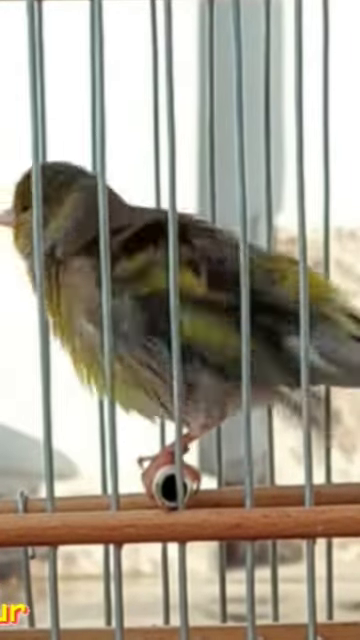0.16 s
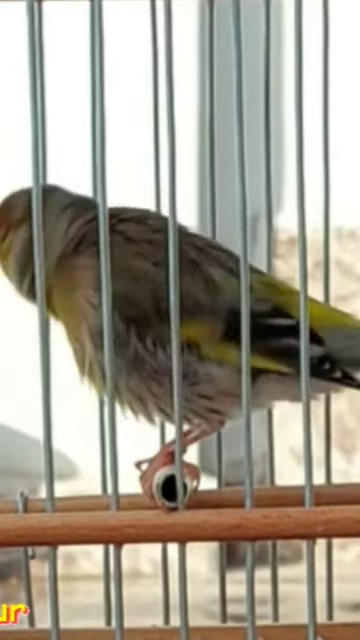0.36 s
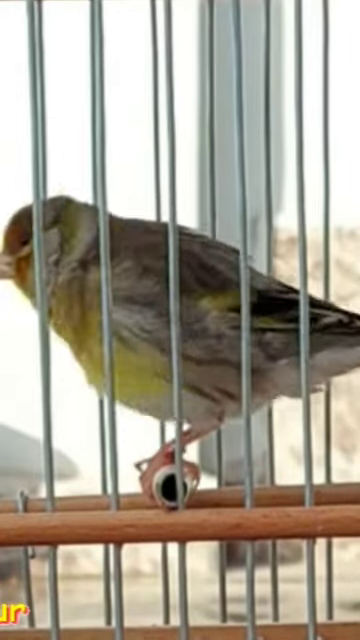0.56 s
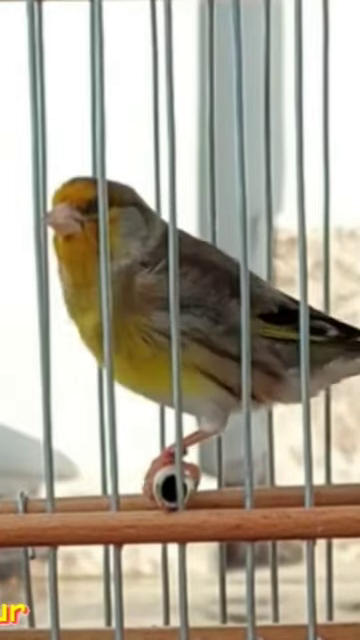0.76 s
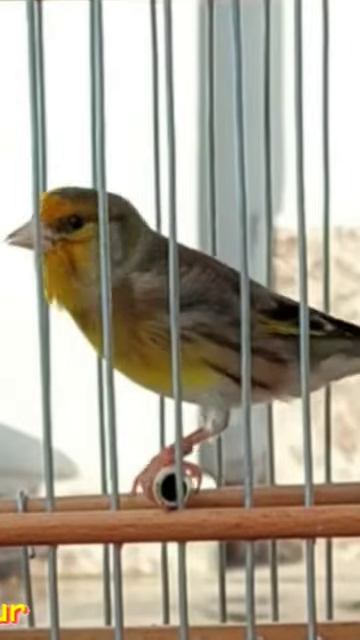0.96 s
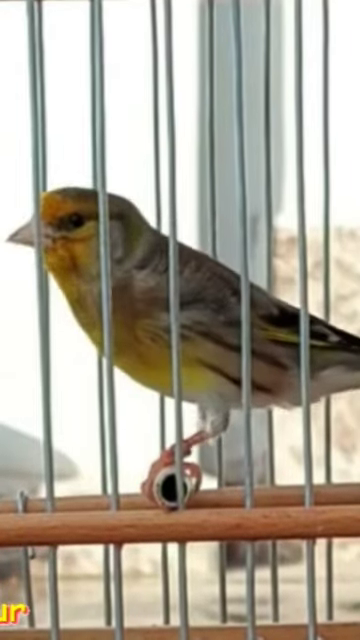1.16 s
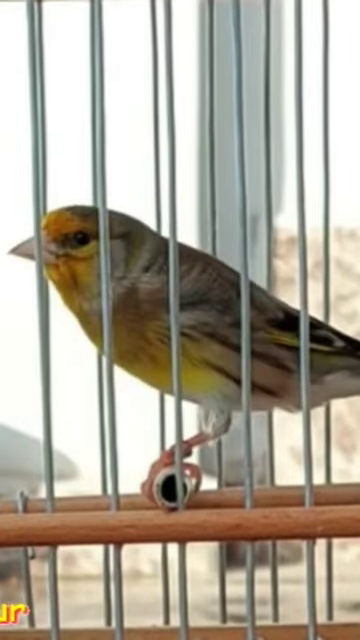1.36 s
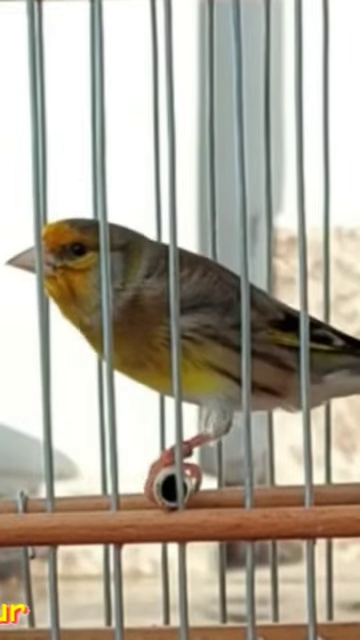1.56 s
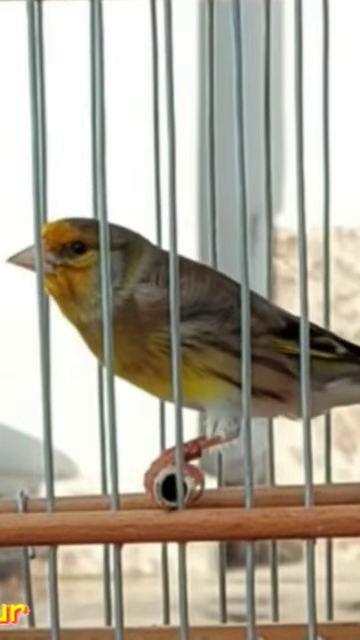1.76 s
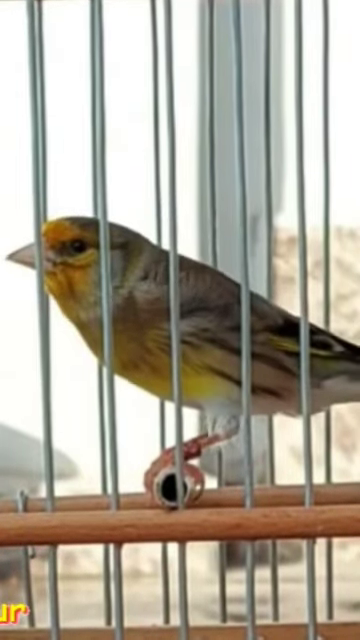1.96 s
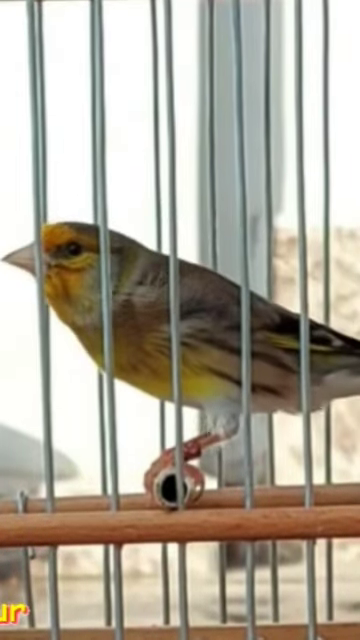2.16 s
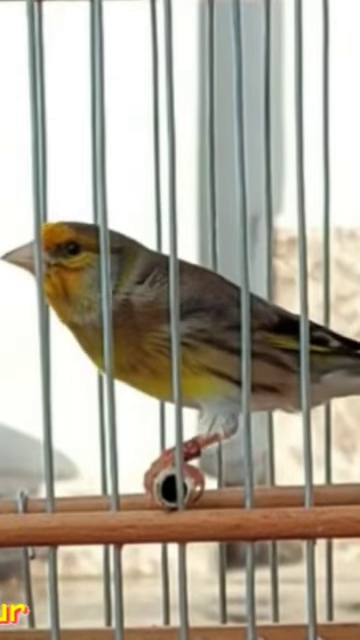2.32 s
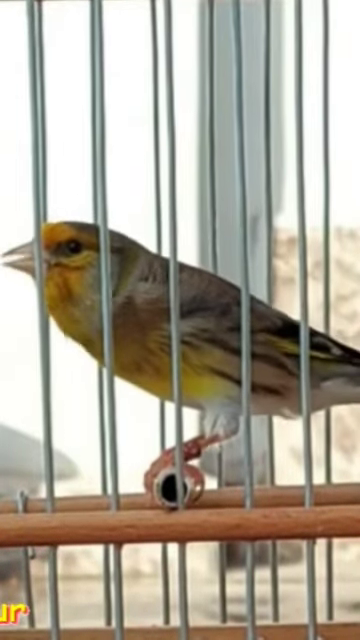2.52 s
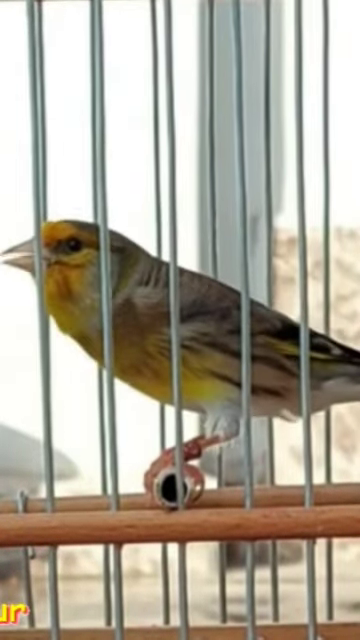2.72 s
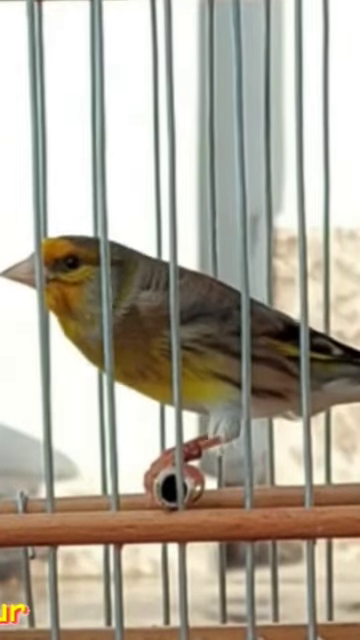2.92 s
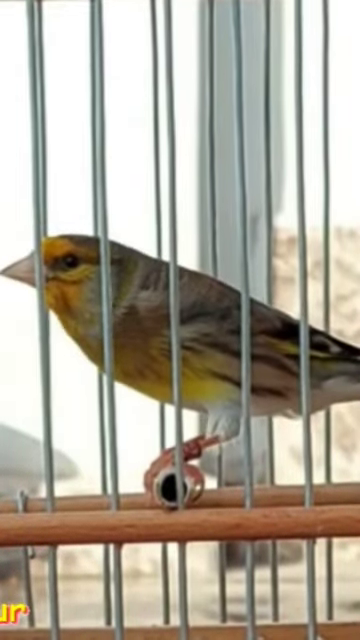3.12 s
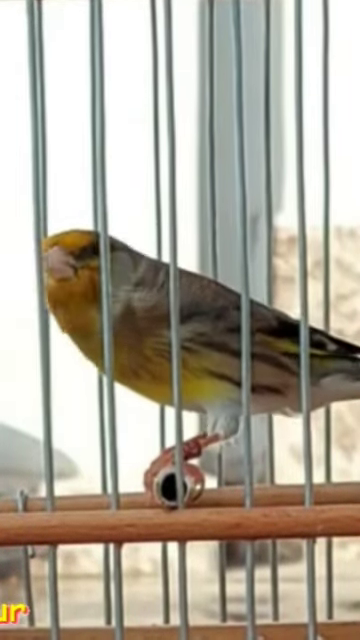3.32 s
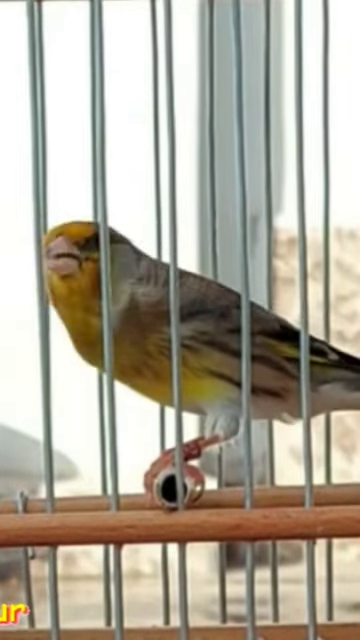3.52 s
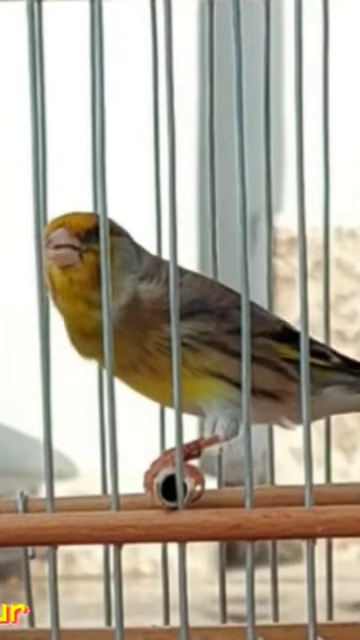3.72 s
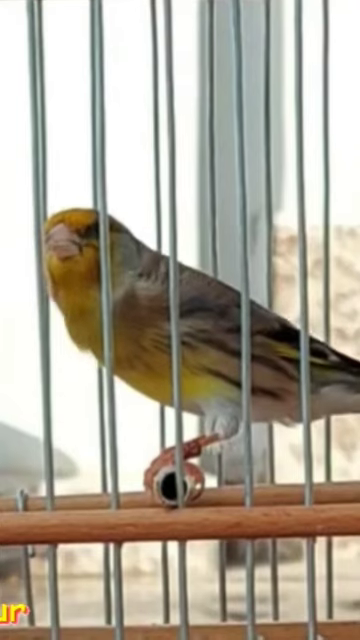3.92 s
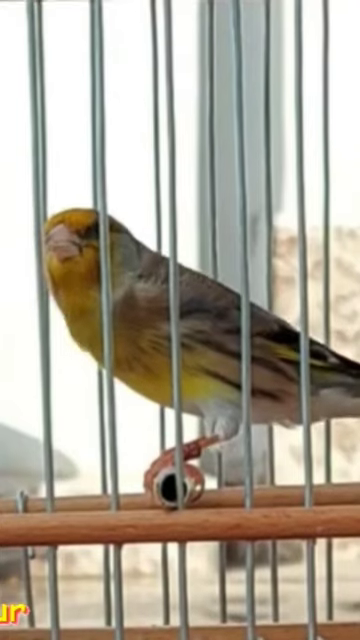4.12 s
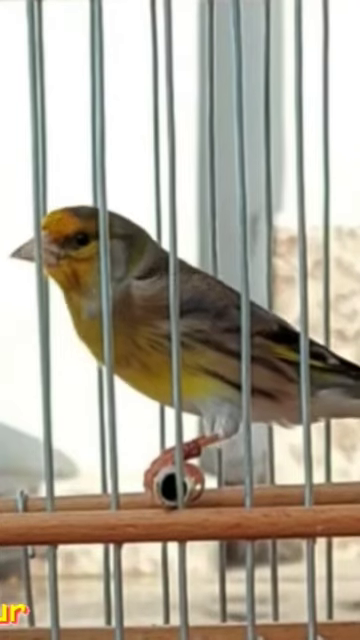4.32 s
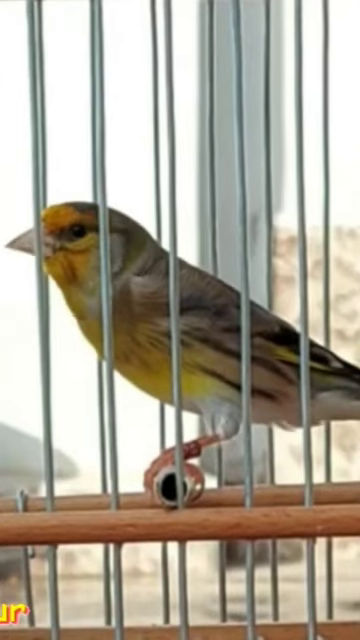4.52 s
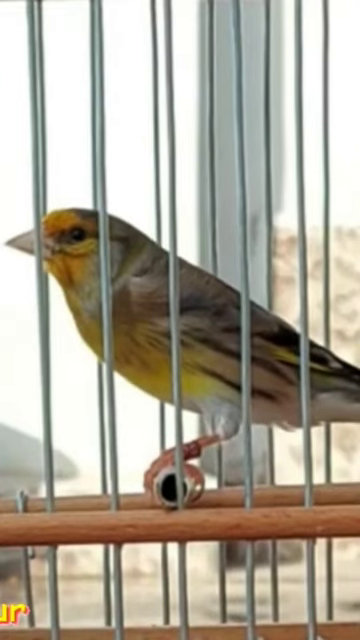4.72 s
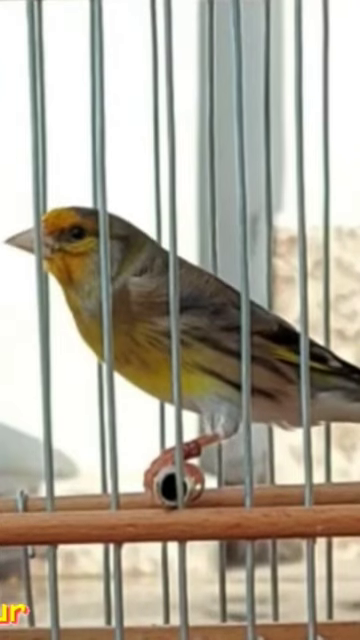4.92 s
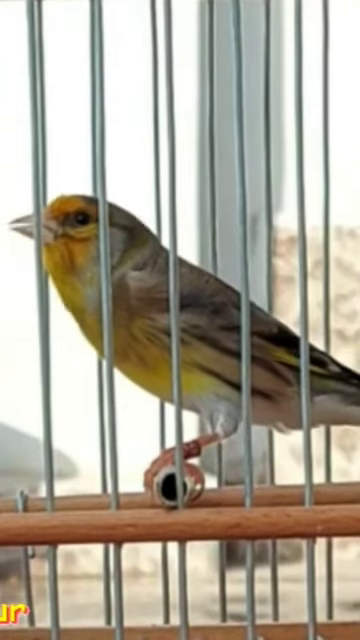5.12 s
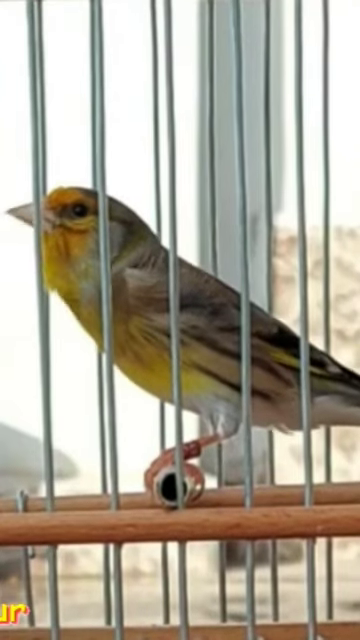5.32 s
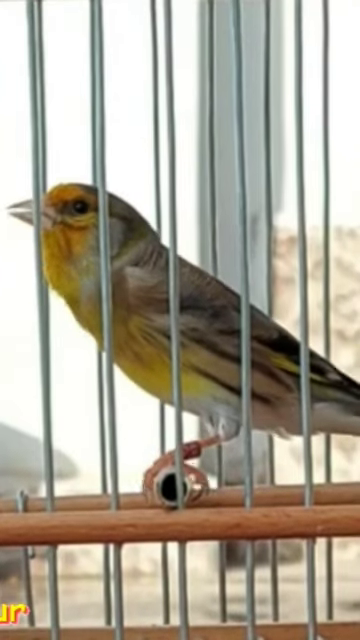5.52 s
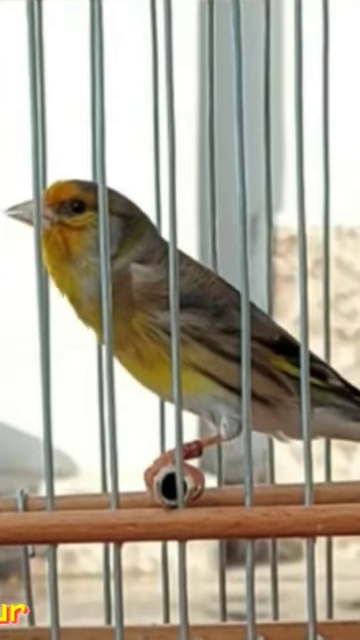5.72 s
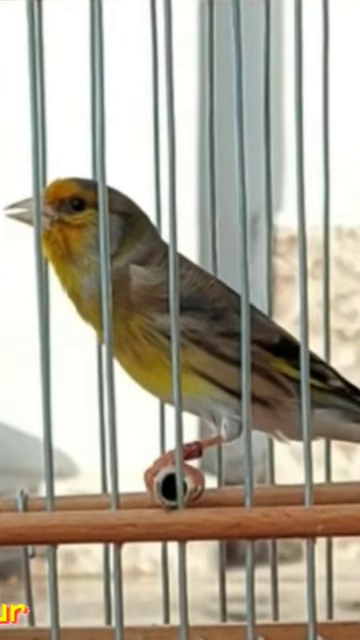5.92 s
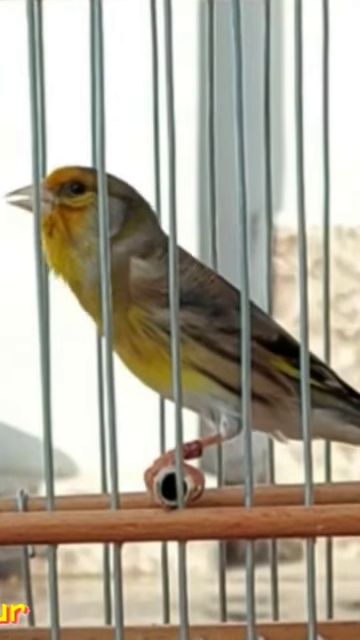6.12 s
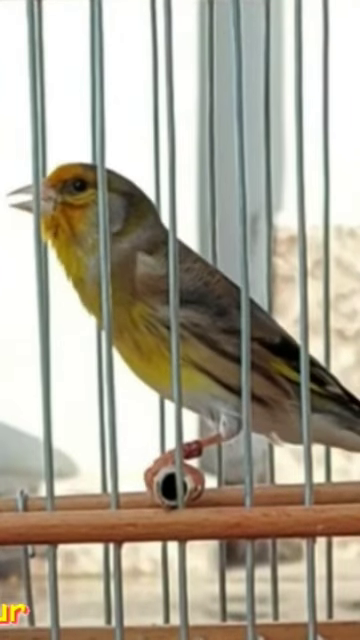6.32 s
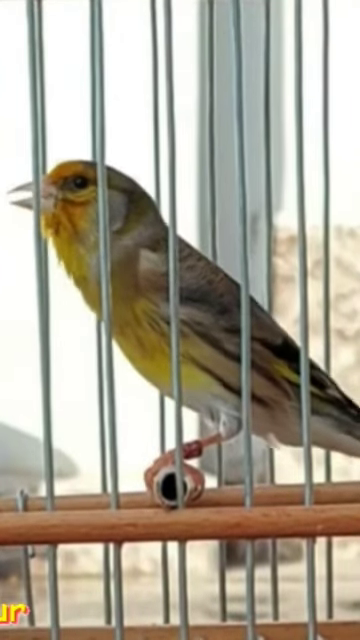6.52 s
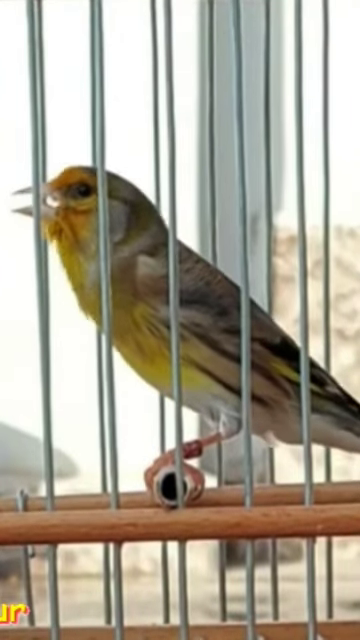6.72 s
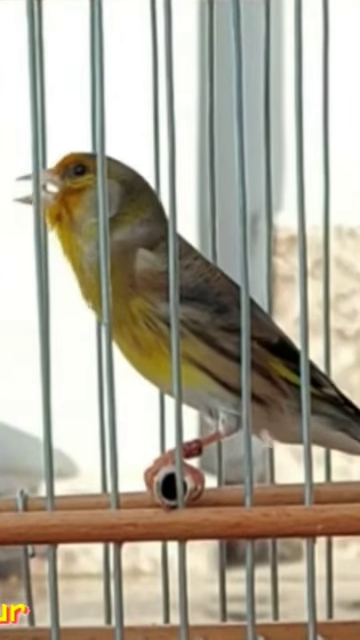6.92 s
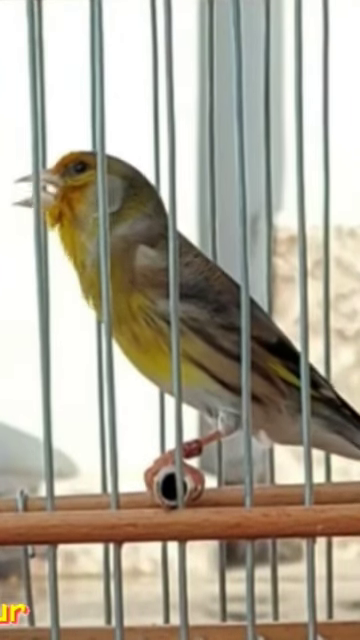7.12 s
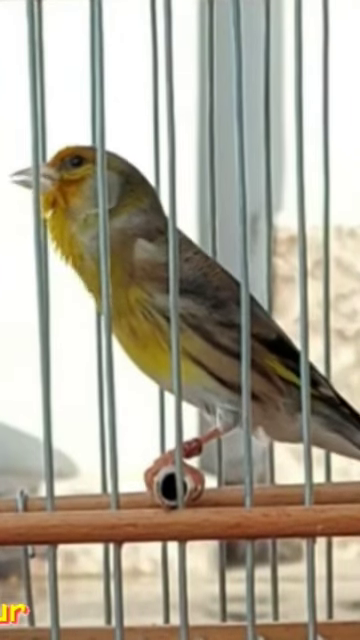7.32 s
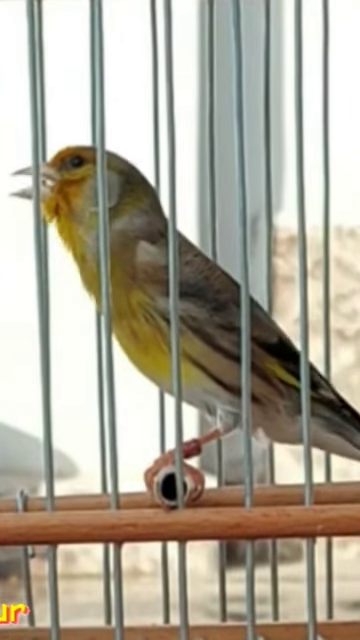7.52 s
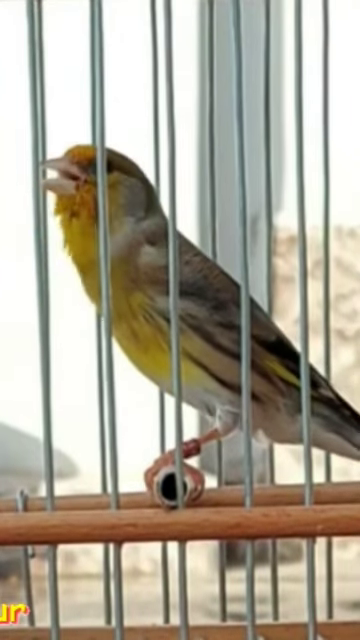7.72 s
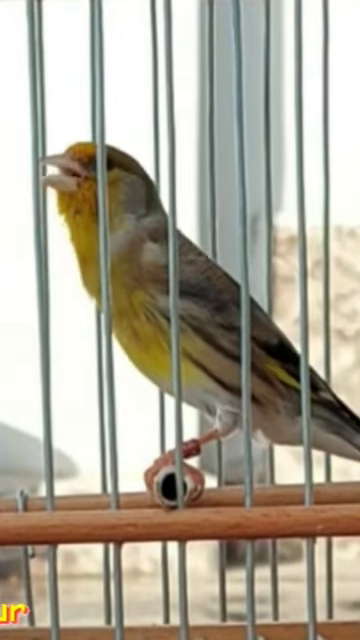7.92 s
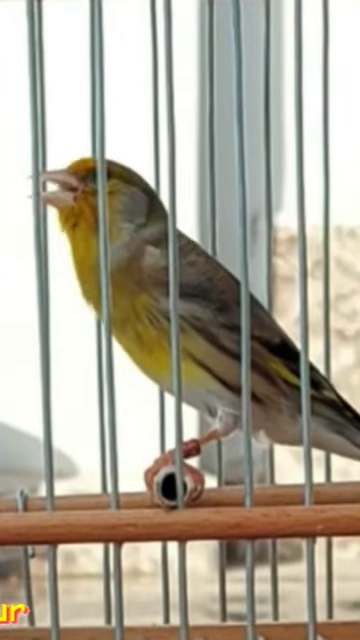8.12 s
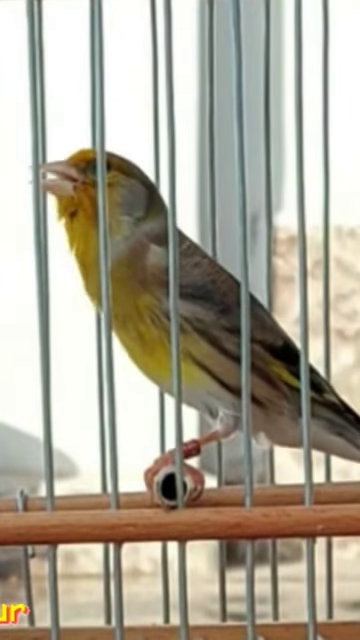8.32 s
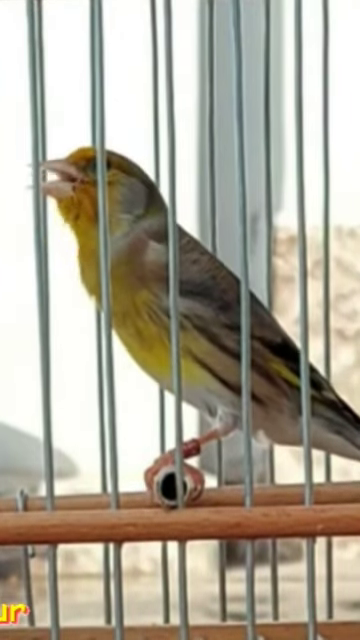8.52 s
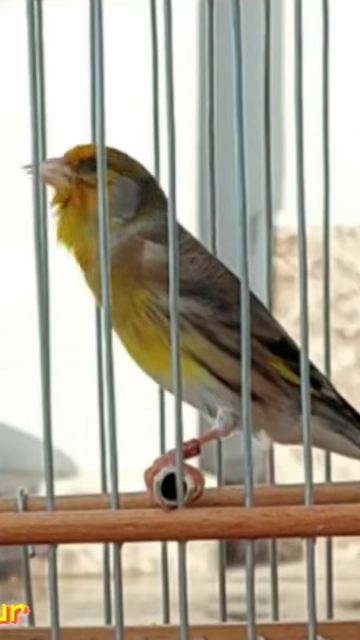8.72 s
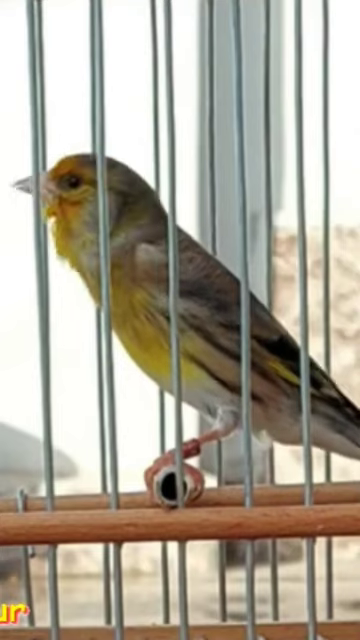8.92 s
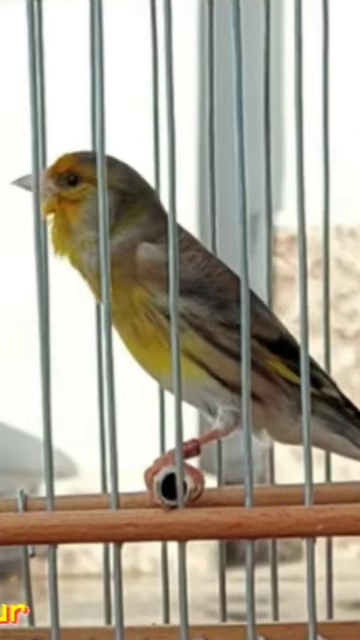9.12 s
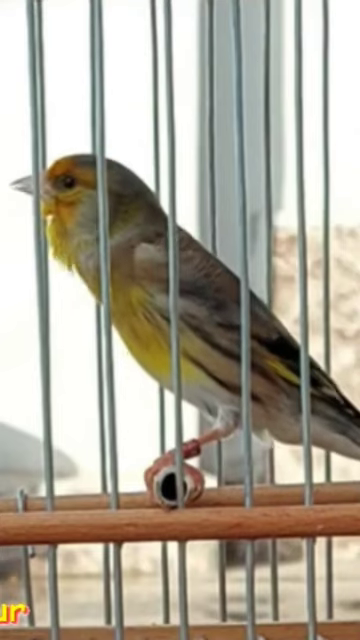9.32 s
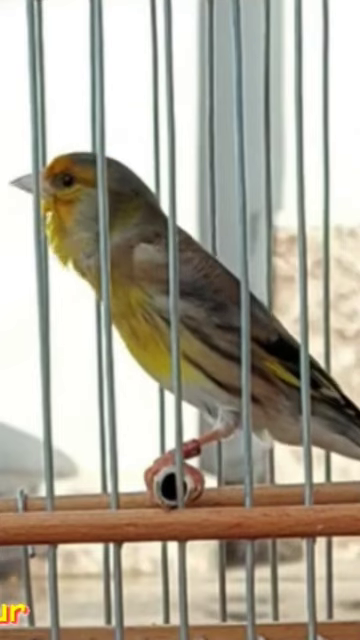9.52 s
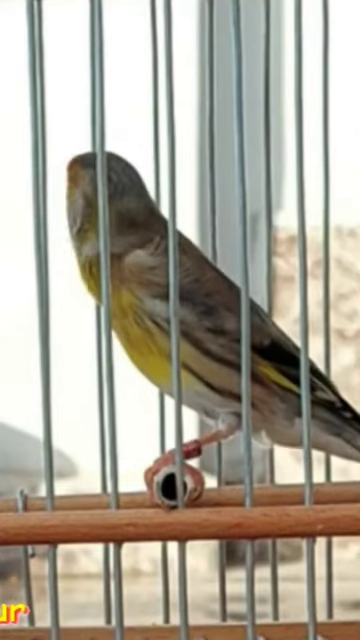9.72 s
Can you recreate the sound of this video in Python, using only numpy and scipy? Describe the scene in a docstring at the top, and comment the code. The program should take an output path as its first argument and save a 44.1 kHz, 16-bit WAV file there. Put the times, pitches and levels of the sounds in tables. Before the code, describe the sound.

A small caged finch, close to the microphone in a lightly echoing room, gives five sharp, slightly buzzy chips about a second apart, the first three followed by a quick two-note rising call. Dull rumble and soft bumps come and go underneath, with very faint whistles from a more distant bird at first. From the middle onward it sings four different rapid trills without a pause, over a quiet low murmur.

```python
"""Caged finch singing

A caged finch gives five chips, each with two voices at once, and short calls answer the first three.
It then sings four trills, each a group of whistled syllables repeated over and over. A faint two-tone tick
with a grainy edge comes early on. The room adds a short tail. Faint whistles come from a bird further off
at the start. Filtered noise makes a dull rumble that comes and goes, with soft bumps, over the room's murmur."""
import sys
import numpy as np
from scipy import signal
from scipy.fft import rfft, irfft
from scipy.io import wavfile
from scipy.ndimage import uniform_filter1d

SR = 44100
rng = np.random.default_rng(int(sys.argv[2]) if len(sys.argv) > 2 else 0)


def dump_mix(stems):
    """Bounce the given channels to the path in sys.argv[1] as a 16-bit WAV at rate SR."""
    frames = np.atleast_2d(stems).T  # one column per channel
    limited = np.clip(frames, -1, 1)  # hard clip at full scale
    pcm = np.round(limited * 32767).astype(np.int16)
    wavfile.write(sys.argv[1], SR, pcm)


N = 430416
TIME = np.arange(N) / SR
SYLLABLE_TIME = np.arange(-SR // 200, SR // 10) / SR  # s, starts just before the syllable

# All levels are relative: later gains and filters still act on them.

# Path of each syllable's pitch and strength, before stretching and retuning: time_s, pitch_hz, effort_db
CHIP_UPPER_PATH = [(0, 5724, -18), (.005, 5715, -2), (.012, 5574, -0.5), (.018, 5335, -2), (.028, 5240, -7),
                   (.038, 5330, -14)]
CHIP_LOWER_PATH = [(0, 5102, -23.5), (.006, 4920, -8), (.018, 4622, 1.5), (0.024, 4426, 1.5),
                   (.033, 4290, -4.5), (.04, 4564, -15.5)]
TU_PATH = [(0, 3250, -16), (.01, 3310, -6), (.018, 3370, -1), (.028, 3395, -2), (.036, 3450, 0),
           (.043, 3480, -12)]
WEE_PATH = [(0, 3650, -13), (.003, 4060, -4), (.008, 4310, -3), (.016, 4245, 0), (.023, 4205, -1),
            (.029, 4150, -15)]
PIP_PATH = [(0, 3080, -18), (.004, 3320, -4), (.009, 3490, 0), (.014, 3520, -6), (.019, 3450, -20)]
TEW_PATH = [(0, 6060, -19.5), (.005, 5695, -15.5), (.009, 5410, -4.5), (.014, 5030, 3.5),
            (.021, 4706, -7.5), (.028, 4590, -10.5), (.038, 4668, -7.5), (.044, 4730, -9)]
SEE_PATH = [(0, 7800, -25), (.004, 7040, 2), (.01, 6800, 0.5), (.024, 6520, -1), (.036, 6600, -5),
            (.042, 6720, -23)]
WHIP_PATH = [(0, 3000, -18), (.004, 3300, -7), (.009, 3560, -2), (.014, 3820, 0), (.019, 4020, -4),
             (.024, 4250, -18)]
EE_PATH = [(0, 5000, -12), (.005, 4930, 0), (.016, 4890, -1), (.029, 4860, -1), (.036, 4850, -14)]
TUP_PATH = [(0, 2200, -13), (.005, 2400, 0), (.011, 2560, -3), (.019, 2720, -17)]
WA_PATH = [(0, 3100, -14), (.006, 3350, -2), (.014, 3490, -1), (.022, 3555, 0), (.03, 3600, -1),
           (.037, 3630, -14)]
TEEU_PATH = [(0, 5600, -19), (.005, 5280, 5), (.01, 5145, 1), (.018, 4890, -0.5), (.027, 4720, -10),
             (.048, 4690, -9.5), (.07, 4718, -9.5), (.078, 4670, -2)]
# The five chips: start_s, level_db, pitch_ratio, length_ratio
CHIP_EVENTS = [(1.059, -24.5, 0.95, 1.23), (2.723, -22.5, 0.97, 1.11), (3.726, -22.5, 0.98, 1.12),
               (4.664, -27.5, 1, 1.026), (5.306, -25.5, 0.99, 1.3)]
# Single tu-wee calls that answer the first three chips: wee_start_s, effort_db, pitch_ratio
ANSWER_CALLS = [(1.235, -4, .993), (2.916, 0, 1.006), (3.923, -1, .997)]
# How hard the bird sings through the first three trills: time_s, effort_db
SONG_EFFORT = [(5.49, 1), (5.64, -1.5), (5.95, -2.5), (6.25, -0.4), (6.54, -0.5), (6.65, -5), (6.74, -.3),
               (7.31, -0.1), (7.8, -0.5), (8.36, -0.85), (8.65, 0), (8.8, -1.5)]
# The slow, freer last trill: tup_start_s, effort_db, pitch_ratio, wait_for_wa_s, wait_for_teeu_s
LAST_TRILL_BEATS = [(8.897, -2, 1.004, 0.044, 0.11), (9.12, -0.5, 0.99, 0.032, .097),
                    (9.326, -2, 1.005, .033, 0.11), (9.541, 0.5, 1.003, .032, 0.097),
                    (9.751, 1.5, 1.03, 0.035, .1)]
# How the beak radiates the voice: frequency_hz, gain_db
BEAK_RESPONSE = [(1500, -2.5), (2300, 0.5), (5700, 0.5), (6300, -4), (6900, -3), (8100, -6), (9300, 1.5),
                 (10600, 1.5), (12100, 0), (13000, -6), (14000, -1), (14800, -4.5), (15600, 3.5)]
# Fading tones of the faint tick, two clear and one very weak: frequency_hz, level_db, time_to_fall_60_db_s
TICK_TONES = [(4430, 13.5, 0.073), (5050, 6.5, 0.069), (5550, -10, 0.065)]
# Start of the phrase sung by the bird further off: time_from_phrase_start_s, pitch_hz, level_db
FAR_PHRASE_NOTES = [(0, 4540, 1), (.072, 6480, -5), (.105, 5407, -1.5)]
# Its repeats: start_s, level_db, closing_note_hz, closing_note_length_s
FAR_PHRASE_REPEATS = [(-.07, -69.5, 3034, 0.26), (.285, -65, 3290, 0.12), (.625, -68, 3326, 0.12),
                      (0.976, -65, 3330, 0.15), (1.315, -72, 3250, 0.153), (1.67, -77.5, 3246, .3)]
# How loud the dull rumble is over time: time_s, level_db
RUMBLE_LEVEL = [(0.0, -50.5), (0.18, -41.5), (0.42, -50.5), (0.52, -42.5), (0.55, -55), (0.64, -35),
                (0.78, -37.5), (0.87, -55.5), (1.01, -51), (1.04, -62.5), (1.42, -57.5), (1.46, -78),
                (1.56, -56.5), (1.96, -67.5), (2.11, -42.5), (2.18, -50), (2.38, -35.5), (2.41, -45),
                (2.92, -42.5), (2.96, -53), (3.04, -37), (3.14, -56), (3.18, -45), (3.59, -86),
                (3.66, -41.5), (3.83, -41.5), (4.01, -56.5), (4.6, -69.5)]
# Spectrum of the rumble: frequency_hz, level_db
RUMBLE_SPECTRUM = [(15, -43), (30, -24), (60, 4.5), (82, -5.5), (113, 4), (190, -6.5), (230, -4),
                   (290, -10.5), (370, -17), (600, -27), (780, -38), (1240, -53), (1800, -67),
                   (2300, -94.5)]
# Soft bumps in the rumble: start_s, level_db, pitch_hz
SOFT_BUMPS = [(0.684, -31.5, 109), (2.332, -29, 260), (2.346, -31, 150), (2.376, -29, 110),
              (3.014, -34.5, 172), (3.654, -39, 119), (3.675, -33, 122), (3.739, -32, 102),
              (3.839, -36, 72.5)]
# Brief brighter surges of the rumble: middle_s, half_length_s, level_db, centre_hz
RUMBLE_SURGES = [(.688, .022, -40.5, 412), (2.345, 0.032, -40.5, 308), (2.54, 0.022, -45.5, 280),
                 (2.715, 0.028, -45.5, 300), (3.79, .012, -42.5, 290)]
# Faint rustles: middle_s, half_length_s, level_db, centre_hz
FAINT_RUSTLES = [(2.15, 0.17, -85, 2750), (3.24, .025, -80.5, 1710)]
# How loud the room's murmur is over time: time_s, level_db
MURMUR_LEVEL = [(0, -66.5), (3.3, -71), (4.5, -76), (5.1, -72), (5.5, -68.5), (5.95, -66.5), (6.8, -69),
                (7.5, -71.5), (8.3, -71.5), (9.7, -71)]
# Spectrum of the murmur: frequency_hz, level_db
MURMUR_SPECTRUM = [(20, -22), (40, -7.5), (60, 3), (82, -5.5), (113, 1.5), (175, -10), (240, -7),
                   (430, -15.5), (560, -16.5), (1000, -23.5), (1800, -31.5), (2200, -42.5), (4400, -73.5)]


def finch():
    """Chips and single calls, then four trills in a row, all coloured by the beak."""
    calls = air(chips(), hiss_db=-32.5, low_db=-14)
    calls += tu_wee(ANSWER_CALLS, tu_db=-25.5, tu_lead_s=0.069, tu_pitch=1.021, tu_length=1.24,
                    wee_pitch=0.99, bright_db=5.5)
    first = trill(start_s=5.488, period_s=0.157, slowing_s=-0.0017, sag=0.004, count=8)
    song = tu_wee(first, tu_db=-26, tu_lead_s=0.065, tu_pitch=1.011, tu_length=1.077,
                  wee_pitch=1.0043, bright_db=0.5)
    song += pip_tew(trill(start_s=6.649, period_s=0.093, slowing_s=0.00043, sag=0, count=13))
    song += see_whip_ee(trill(start_s=7.928, period_s=0.14312, slowing_s=0.0009, sag=0, count=7))
    song += tup_wa_teeu(LAST_TRILL_BEATS)
    return shape(calls + song, BEAK_RESPONSE)


def chips(square_db=-31, third_db=-21, lower_third_db=-22, rasp_db=-26):
    """Both sides of the syrinx, the bird's voice organ, sound at once, beat into a buzz and breed sum tones."""
    out, t = np.zeros(N), SYLLABLE_TIME
    for start, db, pitch, length in CHIP_EVENTS:
        upper_phase, upper_effort = syrinx(CHIP_UPPER_PATH, t, pitch, length, jitter=0.0088)
        lower_phase, lower_effort = syrinx(CHIP_LOWER_PATH, t, pitch, length, jitter=0.0088)
        upper = upper_effort * np.exp(1j * upper_phase)
        lower = lower_effort * np.exp(1j * lower_phase)
        pair = upper + lower
        # multiplying the voices makes tones at the sums of their pitches
        overtones = undb(square_db) * upper * (upper + 2 * lower)
        overtones += undb(third_db) * upper * lower * pair
        overtones += undb(lower_third_db) * lower ** 3
        rasp_noise = unit(band(rng.standard_normal(len(t)), 3700, 5900, order=4))
        rasp = (abs(upper) + abs(lower)) * rasp_noise
        chip = np.imag(pair + overtones) + undb(rasp_db) * rasp
        add(out, start + t[0], undb(db) * chip)
    return out


def tu_wee(beats, tu_db, tu_lead_s, tu_pitch, tu_length, wee_pitch, bright_db):
    """A low rising note leads into a louder high one; bright_db lifts overtones and hiss together."""
    tu = whistles(TU_PATH, beats, level_db=tu_db, after_s=-tu_lead_s, pitch=tu_pitch, length=tu_length,
                  second_db=bright_db - 43, third_db=bright_db - 41, fourth_db=bright_db - 38.5)
    wee = whistles(WEE_PATH, beats, level_db=-22.0, pitch=wee_pitch, length=0.97,
                   second_db=bright_db - 39.5, third_db=bright_db - 40.5)
    return air(tu + wee, hiss_db=bright_db - 40.5, low_db=9)


def pip_tew(beats):
    """The fastest trill: a pip that grows shorter and louder, then a downward sweep."""
    pip = whistles(PIP_PATH, beats, level_db=-26.0, after_s=-0.026, length=1.82, swell_db=0.2355,
                   stretch=-0.059, second_db=-36.0, third_db=-37.0, fourth_db=-33)
    tew = whistles(TEW_PATH, beats, level_db=-22.5, length=1.19, stretch=-0.019,
                   second_db=-32.5, third_db=-20)
    return air(pip + tew, hiss_db=-31.5, low_db=3.5)


def see_whip_ee(beats):
    """A loud upward whip between two thin notes that fade from repeat to repeat."""
    see = whistles(SEE_PATH, beats, level_db=-32.5, after_s=-0.06, pitch=1.003, length=1.077,
                   swell_db=-0.65, second_db=-9.5, third_db=-63.5)
    whip = whistles(WHIP_PATH, beats, level_db=-18.5, after_s=0.001, pitch=0.992, length=0.9,
                    second_db=-24.5, third_db=-39.5, fourth_db=-30)
    ee = whistles(EE_PATH, beats, level_db=-26, after_s=0.021, length=0.99, swell_db=-1,
                  second_db=-43, third_db=-25.5)
    return see + air(whip + ee, hiss_db=-35)


def tup_wa_teeu(beats):
    """Two rising steps, then a long falling whistle."""
    wa_s, teeu_s = np.transpose(beats)[3:]
    tup = whistles(TUP_PATH, beats, level_db=-33.0, pitch=0.98, length=1.26,
                   second_db=-27, third_db=-29.5, fourth_db=-45)
    wa = whistles(WA_PATH, beats, level_db=-28.0, after_s=wa_s, pitch=0.98,
                  second_db=-56, third_db=-41, fourth_db=-43)
    teeu = whistles(TEEU_PATH, beats, level_db=-25.0, after_s=teeu_s, pitch=0.9966, length=0.92,
                    second_db=-35.5, third_db=-19.5)
    return air(tup + wa + teeu, hiss_db=-37)


def trill(start_s, period_s, slowing_s, sag, count):
    """A beat that slows or quickens evenly while the pitch may sag: start_s, effort_db, pitch_ratio."""
    k = np.arange(count)
    start = start_s + period_s * k + slowing_s * k ** 2 / 2
    effort_db = np.interp(start, *np.transpose(SONG_EFFORT))
    return np.transpose([start, effort_db, 1 - sag * k])


def whistles(path, beats, level_db, second_db, third_db, fourth_db=-70, after_s=0, pitch=1, length=1,
             swell_db=0, stretch=0, flicker_db=4):
    """One syllable per beat, a nearly pure tone with uneven overtones; swell_db and stretch add up each time."""
    out, t = np.zeros(N), SYLLABLE_TIME
    s, efforts, ratios = np.transpose(beats)[:3]
    for repeat, start in enumerate(s + after_s):
        phase, effort = syrinx(path, t, pitch * ratios[repeat], length + stretch * repeat)
        tone = np.sin(phase)
        for k, overtone_db in enumerate([second_db, third_db, fourth_db], 2):
            # fade out overtones too high for the sample rate
            in_range = np.clip((np.pi - k * np.gradient(phase)) * 2, 0, 1)
            strength = undb(overtone_db + flicker_db * waver(len(t), 190))
            tone += strength * np.sin(k * phase) * in_range
        gain = undb(level_db + efforts[repeat] + swell_db * repeat)
        add(out, start + t[0], gain * effort * tone)
    return out


def syrinx(path, t, pitch, length, jitter=0.0094, shimmer_db=1.2):
    """One side of the voice organ follows a path with small wobbles: returns its phase and its strength."""
    s, hz, db = np.transpose(path)
    s = np.maximum.accumulate(s) * length
    smooth_hz = uniform_filter1d(np.interp(t, s, hz), size=120)
    wobbly_hz = smooth_hz * pitch * (1 + jitter * waver(len(t), 700))
    # the oscillation builds up and dies away exponentially
    gate = (1 + np.tanh(np.minimum(t, s[-1] - t) / 0.0018)) / 2
    effort = undb(np.interp(t, s, db) + shimmer_db * waver(len(t), 180))
    return 2 * np.pi * np.cumsum(wobbly_hz) / SR, gate * effort


def air(voice, hiss_db, low_db=0):
    """Adds turbulence in the open beak that follows the voice's strength; low_db weights its lowest part."""
    power = uniform_filter1d(uniform_filter1d(voice ** 2, size=300), size=300)
    strength = np.sqrt(np.abs(power))
    # frequency_hz, level_db
    low = [(1500, -30 + low_db), (2200, -10 + low_db), (2700, -2 + low_db), (3600, 2 + low_db / 2)]
    high = [(5500, 0), (7500, -7), (10500, -3), (12500, -5), (14000, -1), (16000, -3)]
    return voice + undb(hiss_db) * strength * noise(low + high)


def two_tone_tick(start_s=0.284, level_db=-45.5, edge_db=-14, edge_s=0.04, grain_db=5):
    """A faint tick: fading steady tones, two of them clear, with a grainy edge of fading noise."""
    out, t = np.zeros(N), np.arange(SR // 4) / SR
    tones = np.zeros(len(t))
    for hz, db, t60 in TICK_TONES:
        tones += undb(db) * np.exp(-np.log(1000) * t / t60) * np.sin(2 * np.pi * hz * t)
    roughness = undb(grain_db * waver(len(t), 500))
    grains = rng.standard_normal(len(t)) * roughness * np.exp(-t / edge_s)
    edge = undb(edge_db) * band(grains, 4100, 16000, order=2)
    onset = np.minimum(t / 0.0027, 1)
    add(out, start_s, undb(level_db) * onset * (tones + edge))
    return out


def room(x, tail_db=-12, treble_db=-6):
    """Adds a short room tail and a stronger one for the treble, whose sound comes back mostly diffuse."""
    full_tail = tail(x, t60_s=0.37, early_db=3.5)
    treble_tail = tail(band(x, 7100, 17000), t60_s=0.26, early_db=-1.5)
    return x + undb(tail_db) * full_tail + undb(treble_db) * treble_tail


def tail(x, t60_s, early_s=0.029, early_db=6):
    """Diffuse room sound: dense early reflections, then a smooth decay."""
    t = np.arange(SR) / SR
    decay = np.exp(-np.log(1000) * t / t60_s) + undb(early_db) * np.exp(-t / early_s)
    response = rng.standard_normal(SR) * decay * np.minimum(t / 0.0081, 1)
    return signal.fftconvolve(x, response / np.linalg.norm(response))[:N]


def far_notes(note_s=0.155, closing_after_s=0.21, closing_db=2.0, fall=0.028, wobble=0.02):
    """A phrase of four soft whistles, each gliding slightly down, sung over and over by a bird further off."""
    out = np.zeros(N)
    for start, level_db, closing_hz, closing_s in FAR_PHRASE_REPEATS:
        notes = [(*note, note_s) for note in FAR_PHRASE_NOTES]
        notes.append((closing_after_s, closing_hz, closing_db, closing_s))
        for after, hz, db, length_s in notes:
            u = np.linspace(0, 1, int(length_s * SR))  # progress through the note
            pitch_hz = hz * (1 + fall * (0.5 - u) + wobble * waver(len(u), 300))
            tone = np.sin(2 * np.pi * np.cumsum(pitch_hz) / SR)
            add(out, start + after, undb(level_db + db) * np.sin(np.pi * u) ** 2 * tone)
    return out


def rumble(low_db=-1, middle_db=-11, upper_db=-31, flutter_db=2.0, usual_db=-45, brightening=0.2):
    """Uneven dull noise in three bands that brightens as it swells, with soft bumps in it."""
    s, db = np.transpose(RUMBLE_LEVEL)
    level = np.interp(TIME, s, db)
    bright = level + brightening * (level - usual_db)
    source = noise(RUMBLE_SPECTRUM) * undb(flutter_db * waver(N, 45))
    out = unit(band(source, 36, 180)) * undb(low_db + level)
    out += unit(band(source, 230, 420)) * undb(middle_db + bright)
    out += unit(band(source, 600, 2200)) * undb(upper_db + bright)
    t = np.arange(SR // 10) / SR
    for start, bump_db, hz in SOFT_BUMPS:
        cycles = hz * t
        swell = 2 * cycles * np.exp(1 - 2 * cycles)  # rises, then dies away within a few cycles
        add(out, start, undb(bump_db) * np.sin(2 * np.pi * cycles) * swell)
    return out * np.clip((s[-1] - TIME) / 0.17, 0, 1)


def puffs(table, spread):
    """Smooth swells of noise, each in a band reaching a factor of spread either side of its centre."""
    out = np.zeros(N)
    for middle_s, half_s, db, hz in table:
        swell = np.exp(-((TIME - middle_s) / half_s) ** 2)
        out += undb(db) * swell * unit(band(rng.standard_normal(N), hz / spread, hz * spread))
    return out


def murmur(level_db=5, early_db=-75, hiss_db=-97):
    """The low background of the room, a slowly wavering noise, and a trace of steady hiss."""
    s, db = np.transpose(MURMUR_LEVEL)
    level = np.interp(TIME, s, db, left=early_db) + level_db + waver(N, 3.6)
    return noise(MURMUR_SPECTRUM) * undb(level) + undb(hiss_db) * rng.standard_normal(N)


def noise(colour):
    """Random noise with a given spectrum, scaled to rms 1."""
    return unit(shape(rng.standard_normal(N), colour))


def shape(x, colour):
    """Filter with a spectrum given as points: frequency_hz, gain_db."""
    hz, db = np.transpose(colour)
    bins_hz = np.fft.rfftfreq(N, 1 / SR) + 1  # 1 Hz up, to keep the logarithm finite
    return irfft(rfft(x) * undb(np.interp(np.log(bins_hz), np.log(hz), db)), N)


def band(x, low_hz, high_hz, order=3):
    """Band-pass filter: keeps what lies between two frequencies."""
    edges = [low_hz, min(high_hz, SR / 2 - 1)]
    return signal.sosfilt(signal.butter(order, edges, "band", fs=SR, output="sos"), x)


def waver(n, rate):
    """A random wander: straight lines between random values drawn rate times a second."""
    knots = np.arange(0, n + SR / rate, SR / rate)
    return np.interp(np.arange(n), knots, rng.standard_normal(len(knots)))


def undb(db):
    """Decibels to gain."""
    return 10 ** (np.asarray(db) / 20)


def unit(x):
    """Scale to rms (average strength) 1."""
    return x / np.sqrt(np.mean(x ** 2))


def add(track, start_s, sound):
    """Mix a sound into a track, leaving out what falls beyond its ends."""
    at = int(start_s * SR) + np.arange(len(sound))
    inside = (at >= 0) & (at < N)
    track[at[inside]] += sound[inside]


def scene():
    """Finch and tick in the room, the far bird as room sound only, over the low background."""
    near = room(finch() + two_tone_tick())
    far = tail(far_notes(), t60_s=0.28, early_db=2.5)
    background = rumble() + puffs(RUMBLE_SURGES, spread=1.304) + puffs(FAINT_RUSTLES, spread=1.3) + murmur()
    return (near + far + background)[None]


def record(dry, double_db=-17, lead_s=0.0175, bass_hz=42, top_hz=15850):
    """A faint copy just ahead doubles the whole sound slightly; the deepest bass and the top are cut."""
    early_copy = np.interp(TIME + lead_s, TIME, dry[0])
    doubled = dry[0] + undb(double_db) * early_copy
    thinned = signal.sosfilt(signal.butter(3, bass_hz, "high", fs=SR, output="sos"), doubled)
    return signal.sosfilt(signal.ellip(10, 0.2, 80, top_hz, fs=SR, output="sos"), thinned)[None]


dry = scene()
out = record(dry)
dump_mix(out)
```